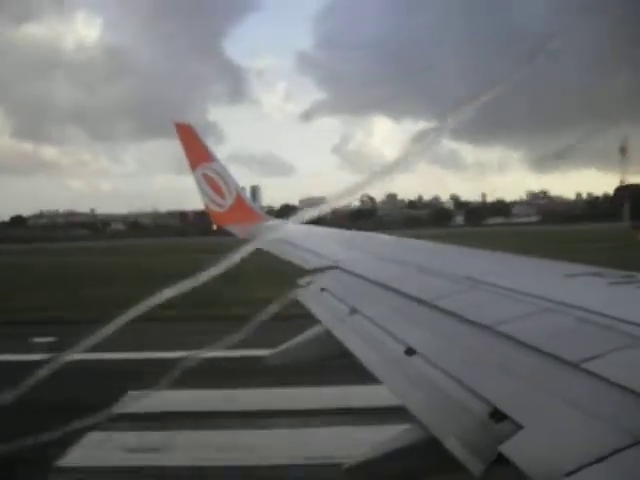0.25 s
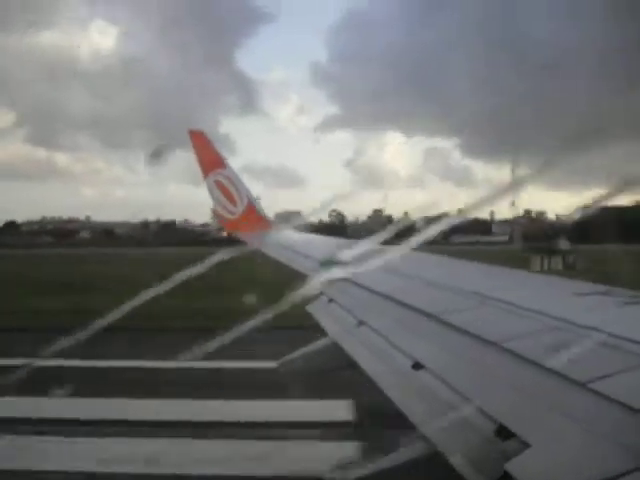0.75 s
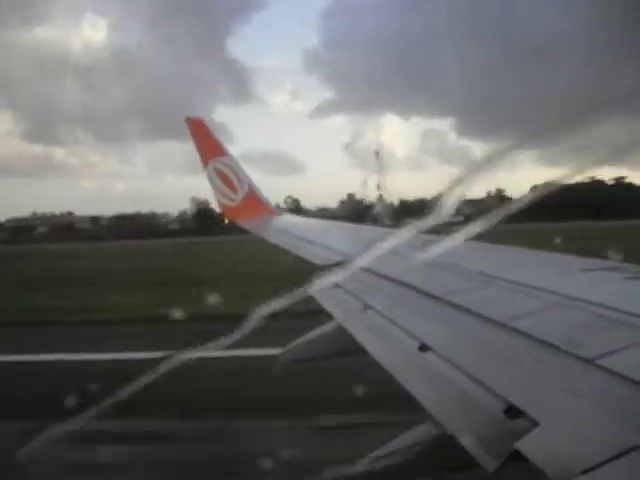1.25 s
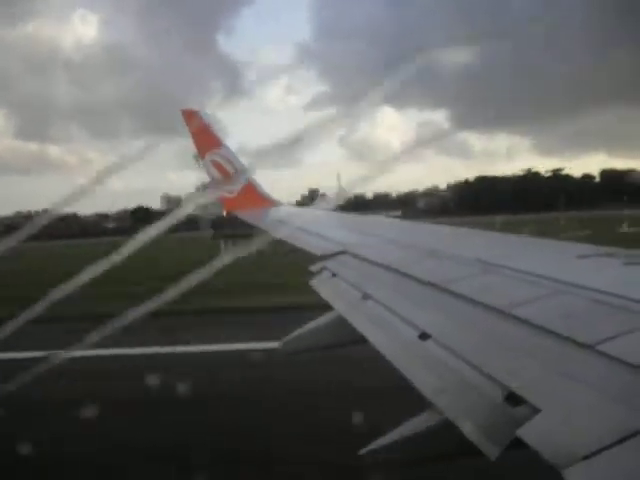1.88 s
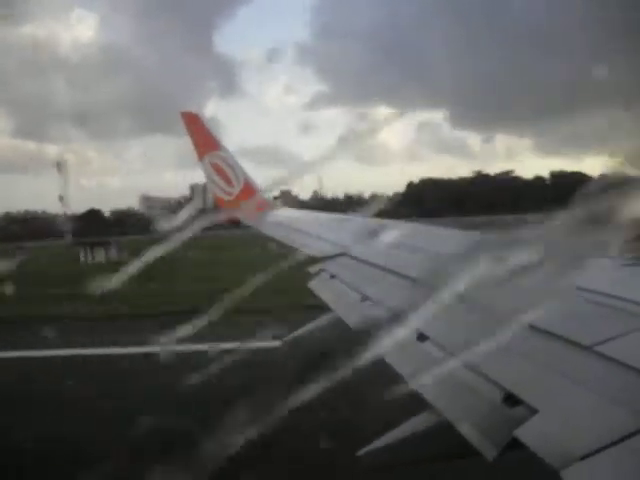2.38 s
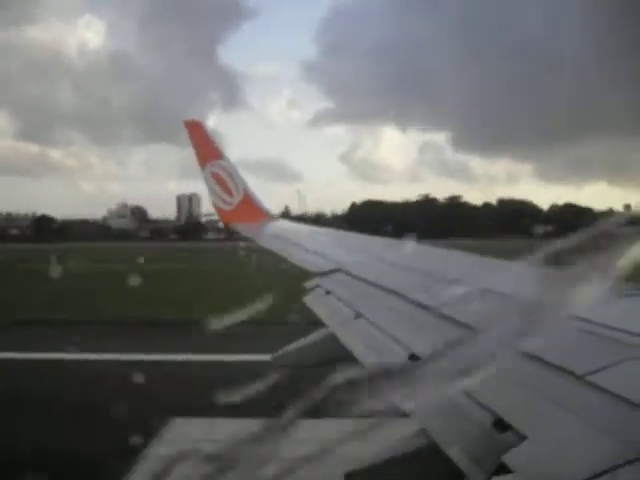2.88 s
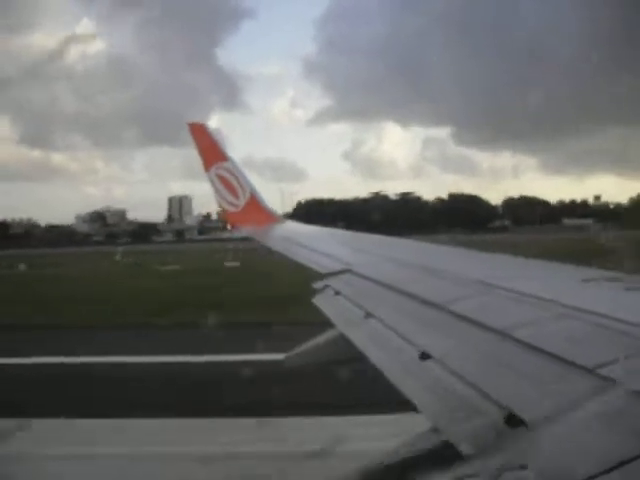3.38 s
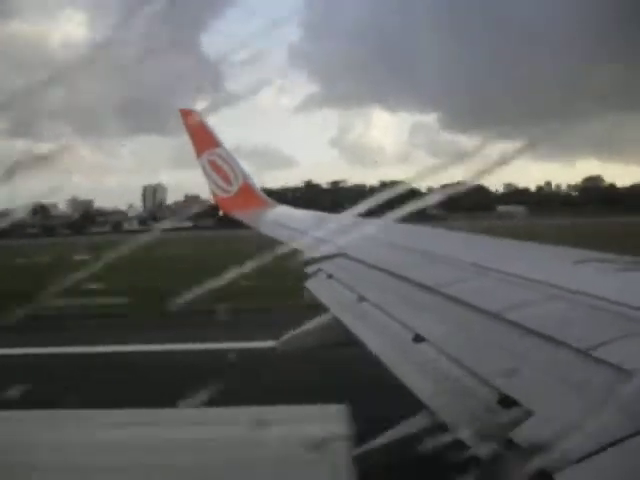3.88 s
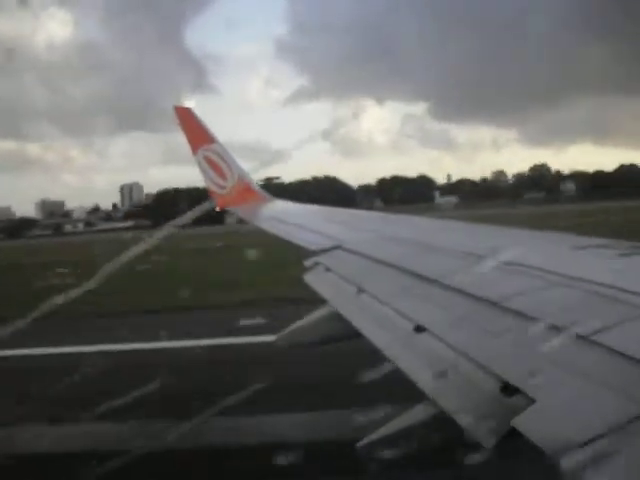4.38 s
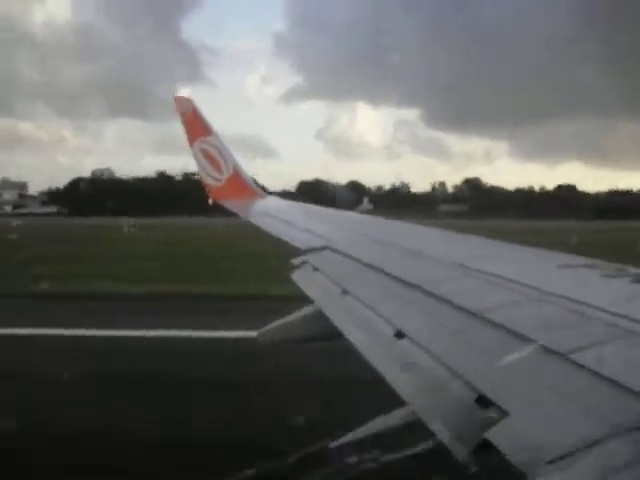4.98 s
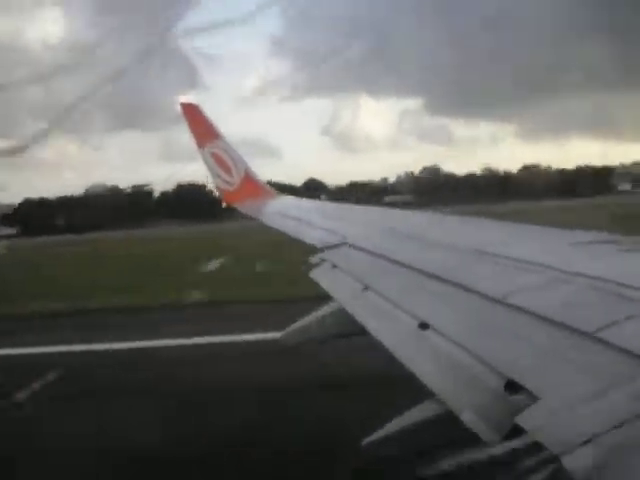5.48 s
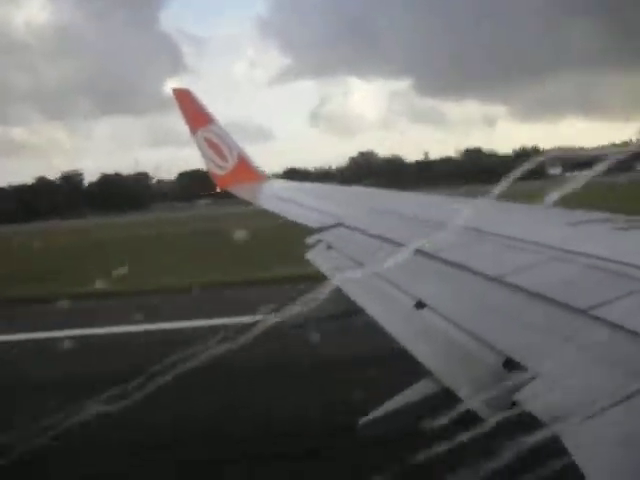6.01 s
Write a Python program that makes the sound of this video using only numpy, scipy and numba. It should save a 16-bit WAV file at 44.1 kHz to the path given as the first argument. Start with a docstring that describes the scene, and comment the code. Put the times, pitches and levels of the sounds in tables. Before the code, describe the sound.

An airliner's takeoff roll heard from the cabin: booming wheel rumble and dull engine roar, distorted and crackly throughout.

```python
"""The wheels of an airliner rumble on its takeoff roll, heard from a window seat behind the wing.
The runway forces the airframe into vibration. The cabin's low resonance booms with the beat of the
two engines and rings briefly at each buffet. The jet exhaust roars through the wall in turbulent
surges, over a faint hiss of air along the fuselage. The bass is far too strong for the microphone's
amplifier, which overloads on most swings and crackles."""
import sys
import numpy as np
from scipy import signal
from scipy.fft import irfft
from scipy.io import wavfile
from numba import njit

SR = 44100
rng = np.random.default_rng(int(sys.argv[2]) if len(sys.argv) > 2 else 0)


def wav_record(signal):
    """Record a signal, one row per channel, as 16-bit PCM in the file named by sys.argv[1]."""
    frames = np.transpose(np.atleast_2d(signal))
    bounded = np.clip(frames, -1, 1)
    # unit amplitude maps onto the largest positive 16-bit level
    quanta = np.round(bounded * 32767).astype(np.int16)
    wavfile.write(sys.argv[1], SR, quanta)


N = 275625
TIME = np.arange(N) / SR

# Spectrum of the airframe shaken by the wheels: f/Hz, relative level/dB
AIRFRAME_SPECTRUM = [(6, -12), (14, -25), (21, -2), (29, -18.5), (39, -4.5), (46, 1), (56, -2), (73, -5),
                     (90, -31)]
# How hard the runway shakes the airframe: t/s, relative level/dB
SHAKE_LEVELS = [(0.0, -1.0), (0.62, 0.8), (0.88, -3.2), (1.17, 2.0), (1.72, -0.8), (2.1, 3.2), (2.35, -0.4),
                (2.76, 2.2), (2.94, -3.8), (3.3, 0.6), (3.68, -2.2), (3.87, -0.3), (4.17, -2.8),
                (4.38, 3.2), (4.85, -0.8), (5.2, -0.8), (5.45, 0.4), (6.25, -1.2)]
# Spectrum of the rolling tyres' drone: f/Hz, relative level/dB
TYRE_SPECTRUM = [(65, -25.5), (80, 0.5), (92, 1), (110, 1.5), (135, -1), (155, -15)]
# Spectrum of the cabin's main low resonance: f/Hz, relative level/dB
CABIN_SPECTRUM = [(125, -25), (146, -10), (160, -0.5), (175, -4), (192, -7.5), (220, -36.5)]
# The strongest buffets: t/s, relative level/dB
BUFFET_PEAKS = [(0.171, 4.3), (0.416, 5.2), (0.572, 1.4), (0.999, 3.2), (1.125, 2.6), (1.266, 4.3),
                (1.375, 4.4), (1.425, 1.7), (1.532, 6.1), (1.769, 1.7), (1.942, 2.3), (2.021, 2.8),
                (2.056, 2.5), (2.294, 2.2), (2.394, 3.8), (2.451, 1.6), (2.932, 3.2), (3.137, 1.7),
                (3.257, 1.6), (3.38, 2.0), (3.514, 4.4), (3.872, 2.1), (3.955, 2.6), (4.195, 2.9),
                (4.329, 5.6), (4.508, 4.0), (4.851, 4.5), (4.911, 3.6), (5.173, 4.4), (5.405, 1.5),
                (5.604, 4.2), (5.74, 3.0), (6.064, 2.4), (6.209, 2.2)]
# Spectrum of the exhaust behind the cabin wall: f/Hz, relative level/dB
EXHAUST_SPECTRUM = [(170, -23.5), (202, 0), (230, 2), (268, -6.5), (320, -6.5), (400, -17), (520, -31.5),
                    (800, -41), (1500, -39.5)]
# Surges of the exhaust's roar: t/s, relative level/dB
EXHAUST_LEVELS = [(0.0, 0.4), (0.27, -1.5), (0.45, 1.7), (0.75, 1.4), (0.98, -1.8), (1.3, 2), (1.88, -0.2),
                  (2.04, 1.7), (2.62, 0.1), (2.93, 1.3), (3.45, -1.5), (3.95, 1.1), (4.7, -1.4),
                  (5.35, -0.5), (5.87, -2.1), (6.25, -1)]
# Spectrum of air rushing along the fuselage: f/Hz, relative level/dB
AIRFLOW_SPECTRUM = [(200, -1.5), (600, -6.5), (1000, -17.5), (1500, -15), (2000, -15.5), (3000, -21),
                    (5000, -26), (7500, -30), (10000, -34), (16000, -38)]
# Modulation spectrum of the turbulence: f/Hz, relative level/dB
TURBULENCE_SPECTRUM = [(2, -12), (3.5, 0), (8, -4.5), (20, -8.5)]


def runway(shake_db=-2.5, tyres_db=-5.0):
    """Forced vibration: the rolling wheels shake the airframe while the tyres drone steadily."""
    rumble = surging(AIRFRAME_SPECTRUM, shake_db + curve(SHAKE_LEVELS), span_s=.034, wander_db=2.0)
    return rumble + gain_of(tyres_db) * noise(TYRE_SPECTRUM)


def cabin_boom(boom_db=-4.5, fade_db_per_s=.37, beat_hz=2.76, depth_db=.94, crest_s=.167):
    """Resonance and beats: the cabin's boom throbs because the two engines run slightly apart."""
    beat_db = depth_db * np.cos(2 * np.pi * beat_hz * (TIME - crest_s))
    return surging(CABIN_SPECTRUM, boom_db - fade_db_per_s * TIME + beat_db, span_s=.027, wander_db=1.0)


def buffets(level_db=1.0, ring_hz=174.9, pitch_spread=.06, sigma_s=.011):
    """Transient excitation: each buffet rings the cabin for a few cycles under a Gaussian envelope."""
    rings = np.zeros(N)
    draws = rng.uniform(-1, 1, (len(BUFFET_PEAKS), 2))
    for (peak_s, peak_db), (phase, detune) in zip(BUFFET_PEAKS, draws):
        near = abs(TIME - peak_s) < 5 * sigma_s
        t = TIME[near] - peak_s
        hz = ring_hz * (1 + pitch_spread * detune)
        envelope = gain_of(level_db + peak_db) * np.exp(-.5 * (t / sigma_s) ** 2)
        rings[near] += envelope * np.cos(2 * np.pi * hz * t + np.pi * phase)
    return rings


def exhaust(roar_db=-7.5):
    """Transmission loss: the cabin wall passes mostly the low end of the jets' turbulent roar."""
    return surging(EXHAUST_SPECTRUM, roar_db + curve(EXHAUST_LEVELS), span_s=.018, wander_db=.68)


def airflow(level_db=-41, fade_db=-3.5, gust_db=2.0):
    """Flow noise: air rushing along the fuselage makes a gusty hiss that slowly eases."""
    gusts = noise([(1.5, 2), (6, -14), (25, -12)])
    progress = (TIME - TIME.mean()) / TIME[-1]
    return gain_of(level_db + fade_db * progress + gust_db * gusts) * noise(AIRFLOW_SPECTRUM)


def surging(spectrum, level_db, span_s, wander_db):
    """Amplitude modulation: noise, evened out over span_s, wanders at random around level_db."""
    carrier = noise(spectrum)
    window = np.exp(-.5 * (np.arange(-SR // 10, SR // 10 + 1) / (span_s * SR)) ** 2)
    squared = np.pad(carrier ** 2, len(window) // 2, "wrap")
    local_power = signal.fftconvolve(squared, window / window.sum(), "valid")
    even = carrier / np.sqrt(abs(local_power) + 1e-6)
    return even * gain_of(level_db + wander_db * noise(TURBULENCE_SPECTRUM))


def noise(spectrum):
    """Superposition: random phases give unit-power noise from rows of f/Hz, relative level/dB."""
    hz, db = np.transpose(spectrum)
    bins = np.fft.rfftfreq(N, 1 / SR)
    shape = gain_of(np.interp(np.log(bins + 1), np.log(hz + 1), db, left=-100, right=-100))
    x = irfft(shape * np.exp(2j * np.pi * rng.random(len(bins))), N)
    return x / x.std()


def curve(points):
    """Linear interpolation between rows of t/s, level/dB."""
    return np.interp(TIME, *np.transpose(points))


def gain_of(db):
    """The decibel scale: 20 dB is a factor of ten in amplitude."""
    return 10 ** (np.asarray(db) / 20)


def scene():
    """Superposition: the sound pressures of all sources add at the window seat."""
    return (runway() + cabin_boom() + exhaust() + airflow() + buffets())[None]


@njit
def overload(x, rail, hold_samples, charge_samples, snap_decay):
    """Saturation: an amplifier driven past its rail sticks there briefly, then snaps back."""
    y = np.empty(len(x))
    side, charge, wait, lag = 0., 0., 0., 0.
    for i in range(len(x)):
        clipped = min(max(x[i], -rail), rail)
        if abs(x[i]) >= rail and (wait <= 0 or x[i] * side > 0):
            side = np.sign(x[i])
            charge += (1 - charge) / charge_samples  # the longer the overload, the longer it sticks
            wait = hold_samples[i] * charge ** 2
            lag = 0.
        elif wait > 0:  # still held at the rail
            stuck = min(wait, 1.)
            lag = stuck * (side * rail - clipped) + (1 - stuck) * lag * snap_decay
            wait -= 1
        else:  # exponential return to the signal
            charge = 0.
            lag *= snap_decay
        y[i] = min(max(clipped + lag, -rail), rail)
    return y


def record(dry, rail=.706, stick_s=.00013, stick_spread=.21, charge_s=.00038, snap_s=.000025):
    """Nonlinear distortion: the amplifier overloads and crackles; a faint steady hiss lies beneath."""
    recovery_wander = noise([(2, 13), (20, -2), (400, -25.5)])
    hold_samples = stick_s * SR * np.exp(stick_spread * recovery_wander)
    distorted = overload(dry[0], rail, hold_samples, charge_s * SR, np.exp(-1 / (snap_s * SR)))
    steady_hiss = gain_of(-66) * noise([(500, 0), (3000, -6), (9000, -19), (16000, -24)])
    low_pass = signal.firwin(201, cutoff=16250, window=("kaiser", 9), fs=SR)
    return signal.oaconvolve(distorted + steady_hiss, low_pass, "same")[None]


dry = scene()
out = record(dry)
wav_record(out)
```